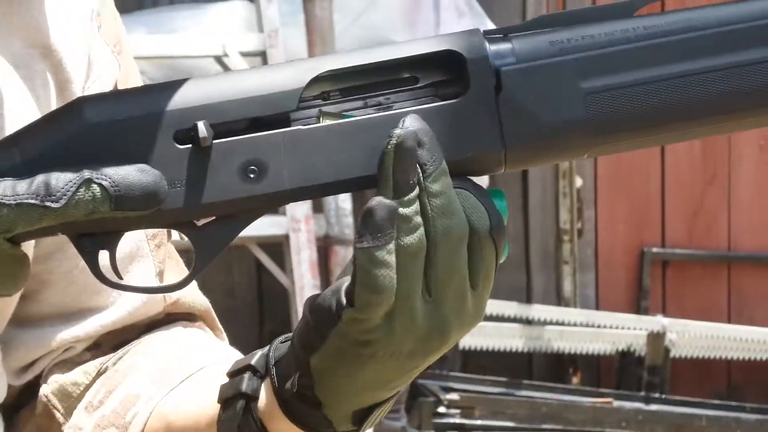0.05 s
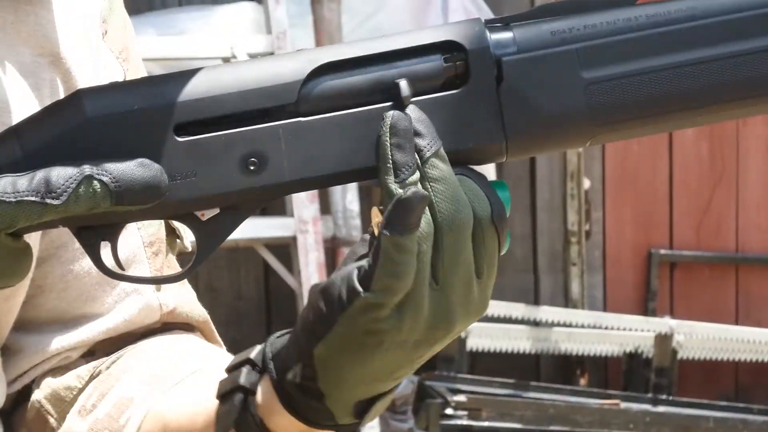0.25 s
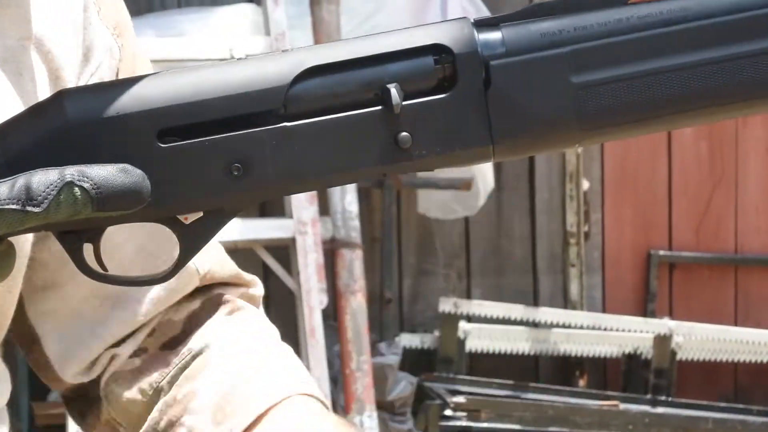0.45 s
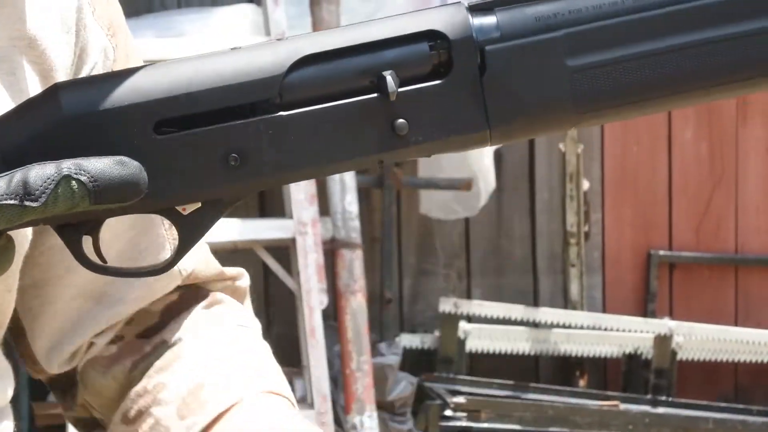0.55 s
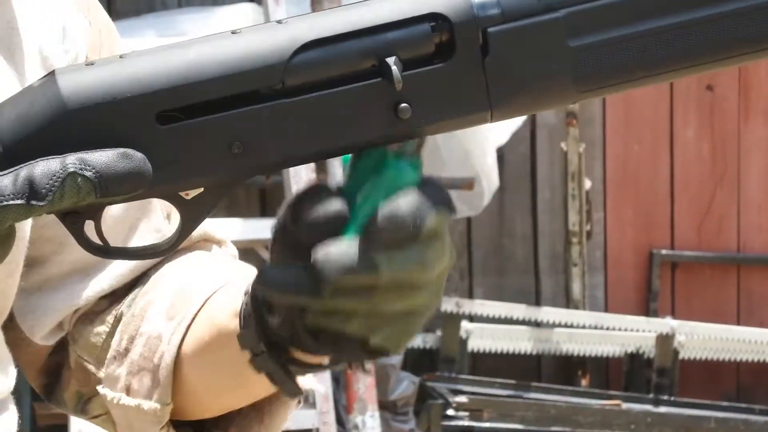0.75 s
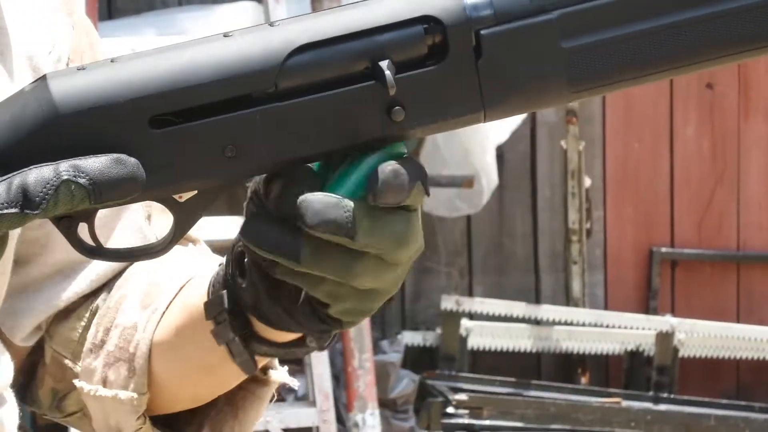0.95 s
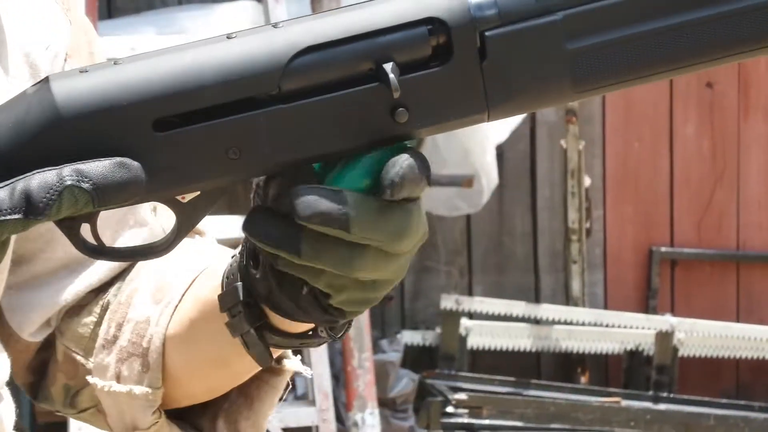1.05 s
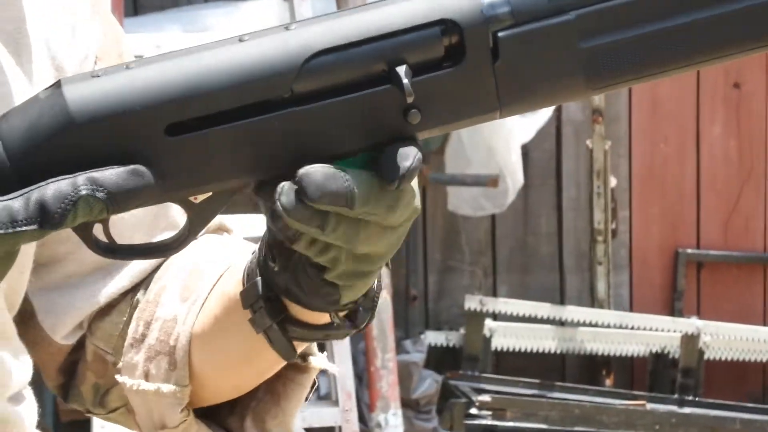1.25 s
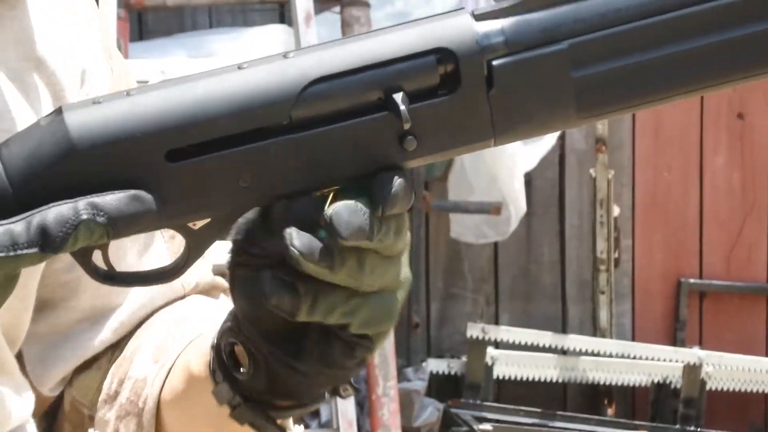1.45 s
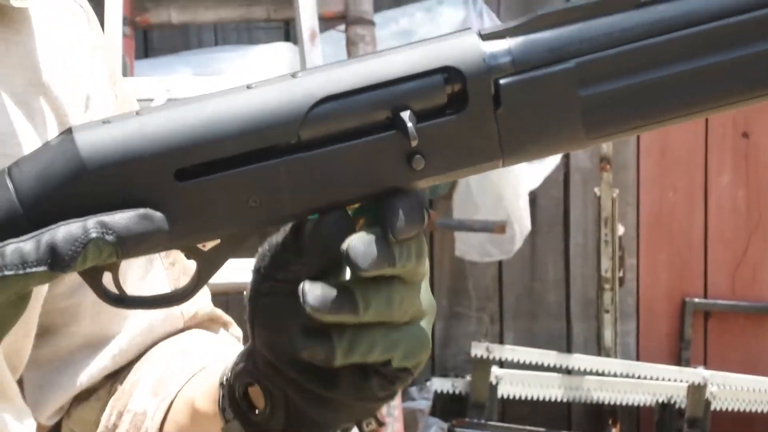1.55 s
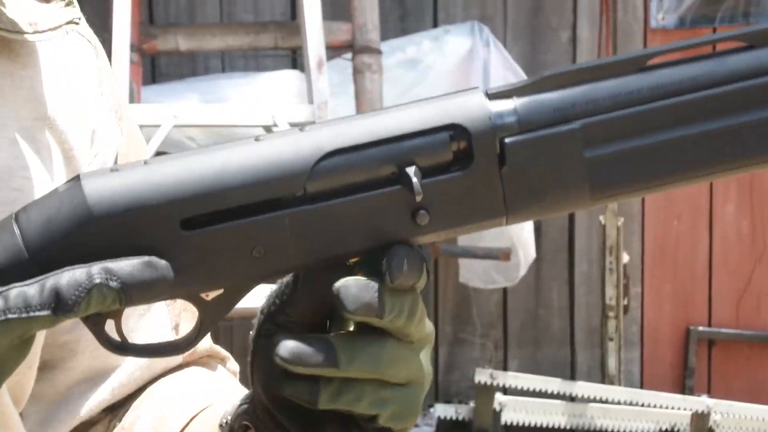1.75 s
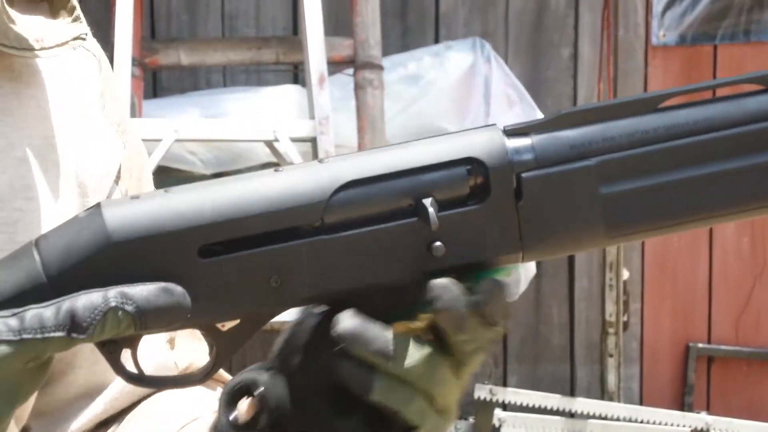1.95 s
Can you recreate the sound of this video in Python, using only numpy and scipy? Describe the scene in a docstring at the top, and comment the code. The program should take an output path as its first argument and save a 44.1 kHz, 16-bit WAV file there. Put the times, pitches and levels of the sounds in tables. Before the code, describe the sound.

Close shotgun loading outdoors: the steel bolt snaps shut with a sharp clack and thump, echoing briefly off nearby walls. Light taps follow, then crisp clicks and a short scrape as a shell is pushed in, over faint background hiss.

```python
"""A shotgun is loaded close by, in a yard between wooden walls, over a faint bed of rumble, hum and hiss.
After a light tap and two clicks, the released bolt rattles forward and slams shut with a thump and a ring
of steel that echoes off the walls. A thin swish rises as a gloved hand fetches a shell. The hand taps the
shell against the loading gate, then pushes it, clicking and scraping, into the magazine as the bed swells."""
import sys
import numpy as np
from scipy import signal
from scipy.fft import rfft, irfft
from scipy.io import wavfile

SR = 44100
rng = np.random.default_rng(int(sys.argv[2]) if len(sys.argv) > 2 else 0)


def file_out(sig):
    """Save sig as 16-bit WAV at sys.argv[1]."""
    # one column per channel
    cols = np.atleast_2d(sig).T
    # limit, then scale
    lim = np.clip(cols, -1, 1)
    pcm = np.round(lim * 32767).astype(np.int16)
    wavfile.write(sys.argv[1], SR, pcm)


N = 88200

# Fader moves of the bed. Each row: time in seconds, rumble and hum level in dB, hiss level in dB.
BED_FADERS = [(0, -59, -60.5), (0.202, -54, -54), (0.3, -59.5, -75), (0.55, -65, -69),
              (0.799, -67.5, -66.5), (1.15, -67.5, -66.5), (1.299, -64.5, -65), (1.43, -60, -58),
              (1.52, -55, -55), (1.64, -53.5, -49), (1.799, -52, -50), (2.0, -50.5, -49.5)]
# Tone of the outdoor rumble and of the hiss. Each row: frequency in Hz, relative gain in dB.
RUMBLE_EQ = [(25, -32), (95, -8.5), (240, -12), (400, -9), (520, -5.5), (900, -6.5), (1600, -9),
             (3000, -17), (5000, -48)]
HISS_EQ = [(1400, -25), (2400, -8.5), (3200, -9.5), (6700, -1), (9200, -2.5), (13500, -15.5),
           (16000, -16.5)]
# Lines of the far hum. Each row: pitch in Hz, level against the rumble in dB.
HUM_LINES = [(298, -15), (500, -15.5), (600, -15.5), (752, -15)]
# Stereo image of the bed and of the gun. Each row: frequency in Hz, left-right likeness (1 is mono).
BED_IMAGE = [(100, 0.96), (600, 0.56), (1500, 0), (5000, 0.081), (12000, 0)]
GUN_IMAGE = [(100, 0.96), (1000, 1), (5000, 0.33), (12000, 0.13)]
# Hits: shell and fingers on the hollow receiver, catch and gate snapping, steel of the closing bolt.
# Each row: start in seconds, level in dB, decay in seconds, bright resonance in Hz.
TAP_HITS = [(0.0766, -32, 0.0012, 5230), (0.8782, -35, 0.0071, 8900), (0.8855, -28.5, 0.0019, 7760),
            (0.8913, -34, 0.0018, 7900), (0.9920, -42, 0.003, 10600), (0.9997, -47, 0.0064, 1750),
            (1.6080, -34, 0.0057, 9650)]
CLICK_HITS = [(0.1729, -38, 0.0028, 8850), (0.1843, -42, 0.0024, 7900), (0.5252, -27, 0.0016, 4850),
              (0.5315, -39.5, 0.0028, 5700), (0.5672, -42, 0.0012, 6600), (0.6030, -44.5, .001, 9660),
              (1.0541, -44.5, 0.0014, 3006), (1.4503, -15.5, 0.0016, 5400), (1.4571, -14, 0.00093, 6320),
              (1.4629, -29.5, 0.0044, 7650), (1.4755, -38, 0.00086, 9100), (1.5175, -24, 0.0024, 3160),
              (1.5188, -38.5, 0.0019, 5800), (1.5240, -30.5, 0.00083, 4260), (1.5637, -34, 0.01, 4450),
              (1.5768, -38, 0.0011, 6100), (1.5815, -31, 0.0038, 4850), (1.8200, -27.5, 0.001, 4120),
              (1.8257, -32.5, 0.0021, 7100), (1.8592, -30.5, 0.0043, 2340), (1.8660, -32.5, 0.0033, 6500),
              (1.9403, -34, 0.002, 10100), (1.9716, -40, 0.021, 6860), (1.9928, -28, 0.0017, 6900)]
BOLT_HITS = [(0.2438, -32.5, 0.0033, 4910), (0.2471, -7, 0.0017, 7460), (0.2505, -9, 0.0016, 4560),
             (0.2573, -13, 0.00092, 6800), (0.2770, -7.5, 0.00065, 7850), (0.2800, -10, 0.0031, 4200),
             (0.2836, -7, 0.0022, 9630), (0.2858, -22, 0.0042, 4427), (0.2953, -19.5, 0.0018, 9940),
             (0.3055, -4.5, 0.0023, 9860), (0.3085, -19.5, 0.0046, 4600), (0.3118, -15, 0.0055, 6980),
             (0.3348, -17.5, 0.012, 8460), (0.3398, -10, 0.0066, 7700), (0.3452, -13, 0.012, 9700)]
# Tone of each kind of contact. Each row: frequency in Hz, relative gain in dB.
TAP_EQ = [(400, -28), (660, -5), (1000, -9.5), (2900, -8.5), (7000, -1), (11000, 0.5), (16000, -14.5)]
CLICK_EQ = [(300, -29.5), (1300, -20), (1700, -10), (2900, -12.5), (4500, -7), (7000, -4.5), (11000, -3.5),
            (13000, -11.5), (19000, -37.5)]
SCRAPE_EQ = [(60, -32.5), (500, -10), (1400, -10), (2300, 0.5), (3100, -4.5), (4300, -1.5), (7000, 2.5),
             (10500, 2), (13000, -6), (16000, -20)]
BOLT_EQ = [(60, -46), (450, -31), (1120, -13), (1450, -22), (1800, -14.5), (3250, -19.5), (3950, -4.5),
           (7000, -3.5), (10500, -2), (13000, -6.5), (15500, -13), (19000, -32)]
CRUNCH_EQ = [(330, -27.5), (510, 4.5), (720, -4), (1200, -4.5), (1600, -11.5), (2200, -6.5), (3200, 0),
             (6000, -29.5)]
# Modes: the brief ping of gate and magazine tube, the long ring of steel, the body of receiver and stock.
# Each row: pitch in Hz, relative level in dB, time to fall 60 dB in seconds.
GATE_MODES = [(1720, -2, .016), (2640, -3.5, .016), (4060, -3.5, .026), (5750, -4, .016)]
STEEL_MODES = [(6840, -9, 0.26), (7670, -7.5, 0.55), (7176, -1, .3), (8060, -11, 0.22), (9100, -7, 0.22),
               (10300, -5, 0.35), (10050, 1, 0.17)]
BODY_MODES = [(102.6, -24, 0.037), (177, -25, 0.051), (490, -13.5, 0.032), (607, -11.5, 0.016),
              (868, -23.5, 0.082), (1290, -28.5, 0.027), (1906, -26, 0.025)]
# The yard's reverb bands. Each row: centre in Hz, level in dB, time to fall 60 dB in seconds.
YARD_BANDS = [(99.7, -29, .25), (300, -19, 0.63), (537, -24.5, 0.23), (820, -13, 0.41), (2126, -5.5, 0.4),
              (4500, -11, 0.45), (7200, -8, 0.46), (10500, -12, 0.36), (15000, -13, 0.37)]
# Strokes of shell and glove along steel. Each row: peak time in seconds, half length in seconds, level in dB.
SCRAPE_STROKES = [(0.228, 0.036, -67), (0.93, 0.06, -64.5), (0.997, 0.022, -70), (1.209, 0.0062, -57.5),
                  (1.366, 0.021, -58), (1.553, 0.025, -41.5), (1.575, 0.01, -33), (1.595, 0.0059, -36.5),
                  (1.992, 0.024, -39.5)]
# Heavy blows that shake the whole receiver. Each row: start in seconds, level in dB.
SLAM_BLOWS = [(0.2835, -20.5), (0.3042, -21), (0.3400, 1.5), (0.343, -7.5)]
# Lean toward the right microphone. Each row: frequency in Hz, right over left in dB.
RIGHT_LEAN = [(100, 0.5), (600, 3), (1500, 1), (2800, 1.5), (4500, 8.5), (7000, 12), (15000, 8)]


def amp(db):
    """Decibels to gain."""
    return 10 ** (np.asarray(db) / 20)


def rms_one(x):
    """Scale to unit power."""
    return x / np.sqrt(np.mean(x ** 2) + 1e-20)


def seconds():
    """Time of every sample."""
    return np.arange(N) / SR


def bins():
    """Frequencies of a double-length transform."""
    return np.arange(N + 1) * SR / (2 * N)


def at_hz(points, hz):
    """Read a curve on a log-frequency axis."""
    point_hz, value = np.transpose(points)
    return np.interp(np.log(np.maximum(hz, 1)), np.log(point_hz), value)


def shape(x, gain):
    """Causal, minimum-phase filter with the given gain per bin."""
    cepstrum = irfft(np.log(gain + 1e-9))
    fold = np.r_[1, np.full(N - 1, 2), 1, np.zeros(N - 1)]
    return irfft(rfft(x, 2 * N) * np.exp(rfft(cepstrum * fold)))[..., :N]


def colour(x, eq):
    """EQ a white sound and keep its power."""
    return shape(x, rms_one(amp(at_hz(eq, bins()))))


def spread(pair, image):
    """Mix two unrelated signals, as mid and side, to left and right."""
    likeness = np.clip(at_hz(image, bins()), -.98, .98)
    mid = shape(pair[0], np.sqrt((1 + likeness) / 2))
    side = shape(pair[1], np.sqrt((1 - likeness) / 2))
    return np.array([mid + side, mid - side])


def delayed(x, lag_s):
    """Delay finer than a sample."""
    return irfft(rfft(x, 2 * N) * np.exp(-2j * np.pi * bins() * lag_s))[:N]


def resonance(x, hz, width_hz):
    """Band-pass with gain 1 at its peak."""
    r, w = np.exp(-np.pi * width_hz / SR), 2 * np.pi * hz / SR
    return signal.lfilter(np.array([1, 0, -1]) * (1 - r * r) / 2, [1, -2 * r * np.cos(w), r * r], x)


def mode(x, hz, t60):
    """One struck mode: a unit click starts a dying sine of height 1."""
    r, w = amp(-60 / (t60 * SR)), 2 * np.pi * hz / SR
    return signal.lfilter([0, np.sin(w)], [1, -2 * r * np.cos(w), r * r], x + 1e-18)


def outdoor_bed():
    """Rumble, far hum and hiss: the bed drops as the bolt rattles, stays low, then swells during loading."""
    t = seconds()
    times, bass_db, hiss_db = np.transpose(BED_FADERS)
    rumble = colour(spread(rng.standard_normal((2, N)), BED_IMAGE), RUMBLE_EQ)
    hiss = colour(spread(rng.standard_normal((2, N)), BED_IMAGE), HISS_EQ)
    hum = sum(amp(db) * rms_one(resonance(rng.standard_normal(N), hz, width_hz=9)) for hz, db in HUM_LINES)
    return amp(np.interp(t, times, bass_db)) * (rumble + hum) + amp(np.interp(t, times, hiss_db)) * hiss


def contacts(hits, eq, bright_gain, bright_width_hz, attack_s=.00008):
    """Each hard contact is a noise crack that dies in milliseconds, with its own bright resonance."""
    track = np.zeros((2, N + SR))
    t = np.arange(SR // 10) / SR
    for start_s, db, decay_s, hz in hits:
        envelope = np.exp(-t / decay_s) * (1 - np.exp(-t / attack_s))
        crack = rng.choice([-1, 1], (2, len(t))) * envelope
        crack = rms_one(crack + bright_gain * resonance(crack, hz, bright_width_hz))
        decay_rms = np.sqrt(np.mean(np.exp(-2 * t / decay_s)))
        start = int(start_s * SR)
        track[:, start:start + len(t)] += amp(db) * crack * decay_rms
    return colour(spread(track[:, :N], GUN_IMAGE), eq)


def with_ring(strikes, modes, ring_db):
    """The strikes plus the ring they leave in the metal."""
    return strikes + sum(mode(strikes, hz, t60) * amp(ring_db + db) for hz, db, t60 in modes)


def receiver_taps():
    """Shell and fingers knock lightly on the hollow receiver."""
    return contacts(TAP_HITS, TAP_EQ, bright_gain=0.92, bright_width_hz=750)


def yard_reverb(send, predelay_s=0.01, build_s=0.0063):
    """Scattered echoes off the walls, unrelated left and right, dying band by band."""
    t = np.maximum(seconds() - predelay_s, 0)
    white = rfft(rng.standard_normal((2, N)), 2 * N)
    centres = [row[0] for row in YARD_BANDS]
    tail = np.zeros((2, N))
    for share, (_, db, t60) in zip(np.eye(len(YARD_BANDS)), YARD_BANDS):
        envelope = amp(-60 * t / t60) * (1 - np.exp(-t / build_s))
        band = irfft(white * at_hz(np.c_[centres, share], bins()))[:, :N]
        tail += amp(db) * band * rms_one(envelope) / np.sqrt(N)
    return signal.fftconvolve(send, tail, axes=1)[:, :N]


def catch_clicks():
    """Catch and loading gate snap with sharp, bright clicks."""
    return contacts(CLICK_HITS, CLICK_EQ, bright_gain=2.67, bright_width_hz=1000)


def scrapes(slips_per_s=3100):
    """Shell and glove drag over steel in dense tiny slips; each stroke swells and fades."""
    t = seconds()
    pressure = sum(amp(db) * np.exp(-((t - peak_s) / half_s) ** 2) for peak_s, half_s, db in SCRAPE_STROKES)
    sizes = rng.standard_normal((2, N))
    slips = rms_one(sizes * (rng.random((2, N)) < slips_per_s / SR))
    return colour(spread(slips * pressure, GUN_IMAGE), SCRAPE_EQ)


def bolt_rattle():
    """The bolt clatters forward, steel on steel, and leaves a high ring."""
    clatter = contacts(BOLT_HITS, BOLT_EQ, bright_gain=1.3, bright_width_hz=660)
    return with_ring(clatter, STEEL_MODES, ring_db=-59)


def slam_thump(crunch_db=-20, crunch_decay_s=0.0049, crunch_hz=1240):
    """Heavy blows crunch the locking parts together and briefly ring receiver and stock."""
    blows = np.zeros(N)
    for start_s, db in SLAM_BLOWS:
        blows[int(start_s * SR)] = amp(db)
    # Neighbouring modes start in opposite polarity.
    body = sum((-1) ** k * amp(db) * mode(blows, hz, t60) for k, (hz, db, t60) in enumerate(BODY_MODES))
    crunch_hits = [(start_s, db + crunch_db, crunch_decay_s, crunch_hz) for start_s, db in SLAM_BLOWS]
    crunch = contacts(crunch_hits, CRUNCH_EQ, bright_gain=0.96, bright_width_hz=350)
    return np.array([delayed(body, lag_s=0.00037), body]) + crunch


def hand_swish(peak_s=.745, half_s=0.075, centre_hz=5520, rise_hz_per_s=7500, flutter_hz=280, db=-67.5):
    """A thin band of noise sweeps upward while the hand fetches the shell."""
    t = seconds() - peak_s
    flutter = signal.sosfilt(signal.butter(2, flutter_hz, fs=SR, output="sos"), rng.standard_normal((2, N)))
    sweep = np.sin(2 * np.pi * (centre_hz * t + rise_hz_per_s * t * t / 2))
    return amp(db) * rms_one(flutter * sweep) * np.exp(-(t / half_s) ** 2)


def scene():
    """Bolt and handling, both sent to the yard's reverb, with the dry swish and the bed."""
    bolt = bolt_rattle() + slam_thump()
    gate = with_ring(catch_clicks() + receiver_taps(), GATE_MODES, ring_db=-33)
    handling = with_ring(gate + scrapes(), STEEL_MODES, ring_db=-51.5)
    echoes = yard_reverb(bolt + amp(-6.5) * handling)
    return bolt + handling + echoes + hand_swish() + outdoor_bed()


def record(dry, low_cut_hz=35, ceiling=0.8, stopband_hz=16600):
    """The right microphone hears more treble, a touch later; then low cut, soft clip and a steep top cut."""
    lean = amp(at_hz(RIGHT_LEAN, bins()))
    left = shape(dry[0], 2 / (1 + lean))
    right = shape(delayed(dry[1], lag_s=.000038), 2 * lean / (1 + lean))
    low_cut = signal.butter(2, low_cut_hz, "high", fs=SR, output="sos")
    top_cut = signal.cheby2(20, 70, stopband_hz, fs=SR, output="sos")
    trimmed = signal.sosfilt(low_cut, np.array([left, right]))
    rounded = ceiling * np.tanh(trimmed / ceiling)
    return signal.sosfilt(top_cut, rounded)


dry = scene()
out = record(dry)
file_out(out)
```